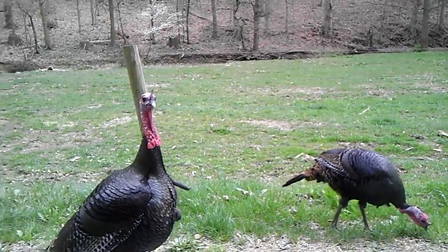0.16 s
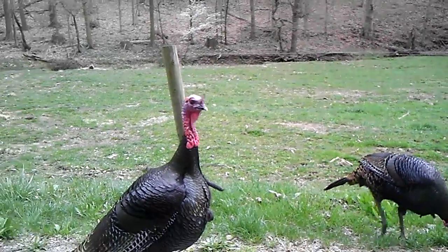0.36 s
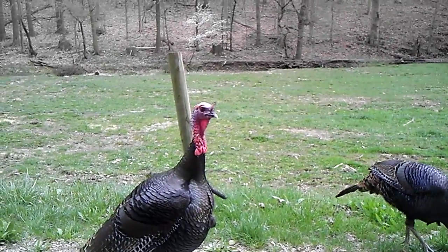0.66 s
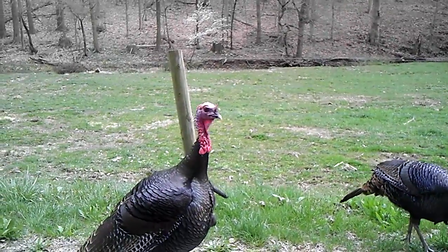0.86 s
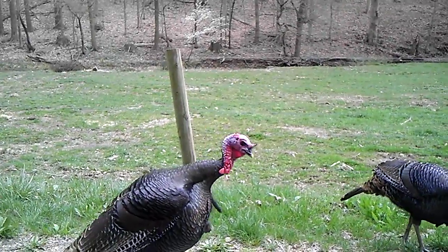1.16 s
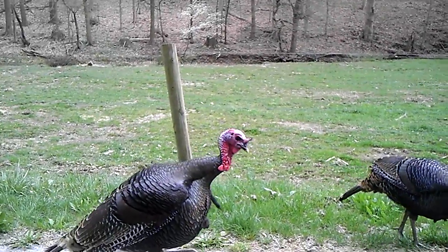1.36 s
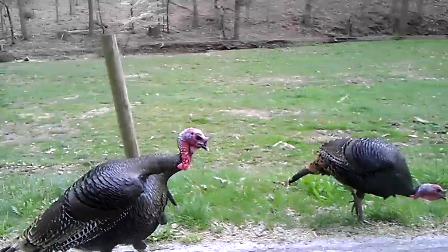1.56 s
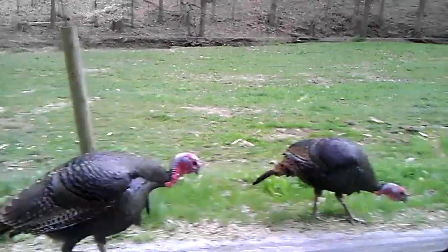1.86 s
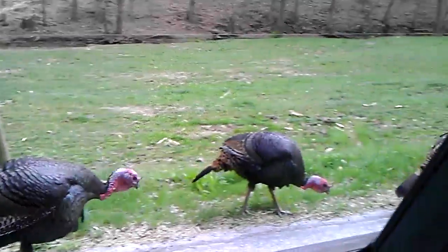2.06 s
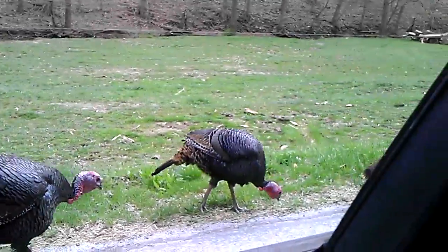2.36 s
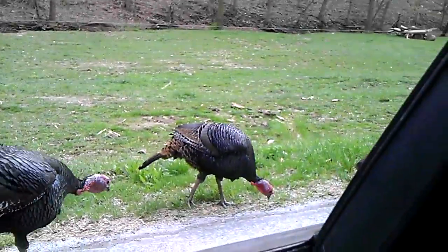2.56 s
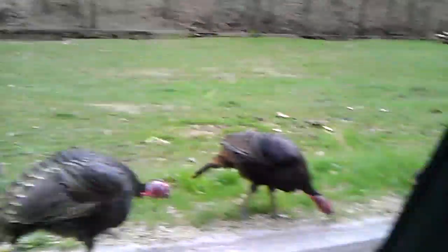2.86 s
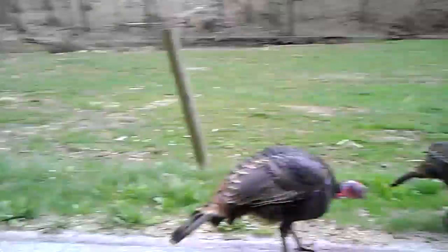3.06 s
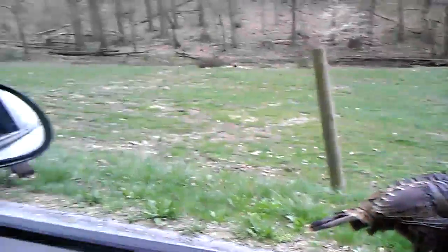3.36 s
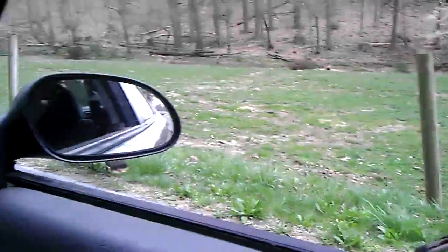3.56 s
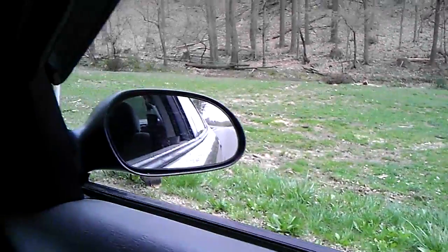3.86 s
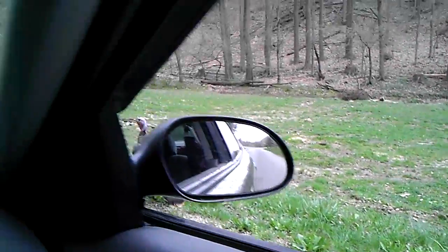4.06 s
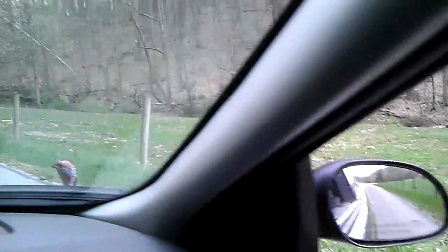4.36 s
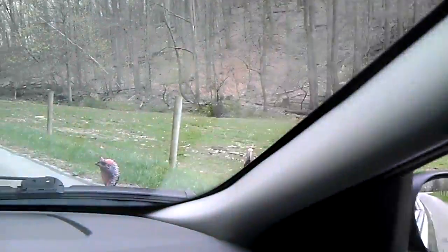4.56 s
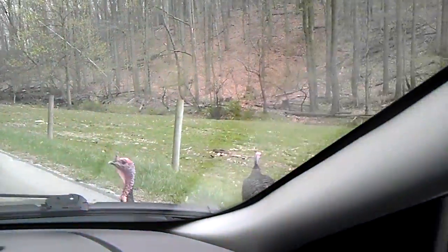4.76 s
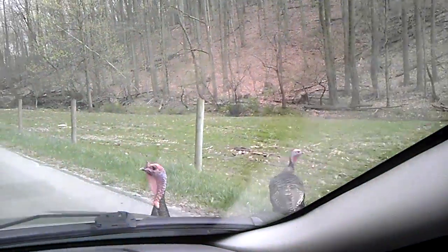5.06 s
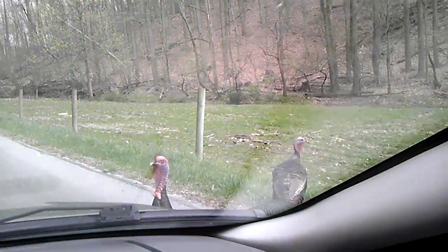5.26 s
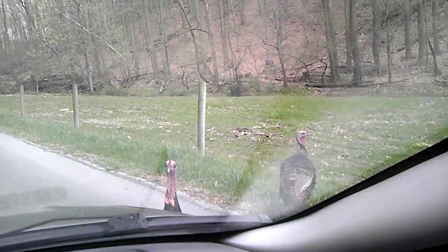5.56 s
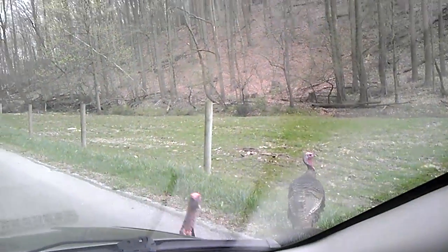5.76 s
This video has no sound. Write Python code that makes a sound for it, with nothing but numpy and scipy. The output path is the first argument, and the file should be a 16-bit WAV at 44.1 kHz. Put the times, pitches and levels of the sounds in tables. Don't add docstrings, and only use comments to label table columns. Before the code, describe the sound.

Wild turkeys at a roadside give three quick pairs of rising putts and falling, warbled yelps, then a close rolling purr. Fingers knock plastic and cloth brushes the handheld camera as it swings. A fainter purr follows farther off, over an idling engine and a low outdoor wash that dulls inside the car.

```python
import sys
import numpy as np
from scipy import signal
from scipy.io import wavfile
from scipy.ndimage import uniform_filter1d

SR = 44100
rng = np.random.default_rng(int(sys.argv[2]) if len(sys.argv) > 2 else 0)


def invert_db(x):
    u = np.asarray(x, float) / 20
    return 10 ** u


def wav_record(signal):
    frames = np.transpose(np.atleast_2d(signal))
    bounded = np.clip(frames, -1, 1)
    quanta = np.round(bounded * 32767).astype(np.int16)
    wavfile.write(sys.argv[1], SR, quanta)


N = 260631


def evened(x):
    return x / np.sqrt(np.mean(x ** 2) + 1e-20)


def read(points, hz):
    f, value = np.transpose(points)
    return np.interp(np.log(hz + 1), np.log(f + 1), value)


def along(rows):
    return np.interp(np.arange(N) / SR, [r[0] for r in rows], [r[1] for r in rows])


def swells(rows, rise_db_s, fall_db_s, rest_db):
    t = np.arange(N) / SR
    level = np.full(N, rest_db, float)
    for s, hold, db in rows:
        rise = rise_db_s * np.maximum(s - t, 0)
        fall = fall_db_s * np.maximum(t - s - hold, 0)
        level = np.maximum(level, db - rise - fall)
    return level


def add(mix, s, sound, pan_db, lead=0):
    side = np.tan(lead / 2) * signal.hilbert(sound).imag
    ports = np.array([sound - side, sound + side])
    part = mix[:, round(s * SR):][:, :len(sound)]
    part += invert_db(np.array([[.5], [-.5]]) * pan_db) * ports[:, :part.shape[1]]


def fuzz(hz, width_hz):
    r = np.exp(-np.pi * width_hz / SR)
    slow = signal.lfilter([1], np.convolve([1, -r], [1, -r]), rng.standard_normal((2, N)))
    carrier = np.exp(2j * np.pi * np.cumsum(hz * np.ones(N)) / SR)
    return evened(((slow[0] + 1j * slow[1]) * carrier).real)


def whistle(rows, crest=0, swing=0, dip_db=0):
    warble_hz, dip_lag_s, skew = 40.7, 0.012, .35
    onset_s, release_s, scoop = .006, 0.0073, 0.76
    s, hz, db = np.transpose(rows)
    t = np.arange(s[0] - onset_s, s[-1] + release_s, .001)
    shake = 2 * np.pi * warble_hz * (t - crest)
    pitch = np.interp(t, [t[0], *s], [scoop * hz[0], *hz])
    pitch = pitch * (1 + swing * (np.sin(shake + 0.77) + skew * np.sin(2 * shake + 2.8)))
    gain = np.interp(t, [t[0], *s, t[-1]], [1e-4, *invert_db(db), 1e-4])
    dip = (.5 + .5 * np.cos(shake - 2 * np.pi * warble_hz * dip_lag_s)) ** 2
    return np.transpose([t, pitch, 20 * np.log10(gain) - dip_db * dip])


def yelp(rows, octave_db, twelfth_db, steep):
    s, hz, db = np.transpose(rows)
    t = np.arange(s[0], s[-1], 1 / SR)
    pitch = uniform_filter1d(np.interp(t, s, hz), size=60)
    pitch = pitch * (1 + 0.053 * uniform_filter1d(rng.standard_normal(len(t)), size=50))
    turn = 2 * np.pi * np.cumsum(pitch) / SR
    climb = np.maximum((pitch / pitch.max()) ** steep, invert_db(-27))
    overtones = invert_db(octave_db) * np.sin(2 * turn) + invert_db(twelfth_db) * np.sin(3 * turn)
    level = uniform_filter1d(np.interp(t, s, invert_db(db)), size=40)
    return level * (np.sin(turn) + climb * overtones)


# time in seconds, pitch in Hz, peak level in dB.
RISING_PUTTS = [
    [(.398, 1217, -25.5), (.402, 1240, -32), (.405, 1416, -28), (.412, 1475, -32), (.426, 1350, -35.5)],
    [(.762, 1174, -16), (.765, 1435, -21), (.771, 1850, -41), (.776, 1835, -29.5), (.784, 1865, -44)],
    [(1.04, 1200, -32), (1.047, 1550, -28), (1.049, 1600, -46), (1.053, 1680, -47)],
]
# time in seconds, pitch in Hz, peak level in dB.
OPENING_NOTES = [
    [(2.54, 1070, -31), (2.545, 1210, -32), (2.55, 1180, -37), (2.557, 1240, -31), (2.565, 1190, -23.5),
     (2.575, 1150, -42), (2.579, 1160, -35)],
    [(2.61, 1135, -30), (2.62, 1155, -23), (2.626, 1230, -40), (2.632, 1220, -34), (2.64, 1210, -43)],
    [(4.196, 950, -43), (4.204, 1150, -48), (4.217, 1250, -43), (4.229, 1190, -47), (4.234, 1020, -44),
     (4.243, 1040, -42)],
    [(4.281, 1140, -46), (4.286, 1160, -38), (4.291, 1220, -43), (4.296, 1250, -39)],
]
# time in seconds, pitch in Hz, peak level in dB.
FALLING_YELPS = [
    [(.501, 1245, -29), (.51, 1210, -28), (.527, 1203, -24), (.545, 1050, -30.5), (.626, 878, -31),
     (.649, 763, -36)],
    [(.851, 1454, -45), (.857, 1250, -29), (.864, 1183, -21), (.882, 1140, -22), (.889, 979, -28),
     (.918, 860, -29.5)],
    [(1.153, 1313, -30), (1.158, 1310, -24), (1.161, 1120, -33), (1.166, 1042, -23.5), (1.178, 1010, -21.5),
     (1.197, 885, -36.5)],
]
# time of a crest in seconds, pitch swing as a share, dip in dB.
WARBLE = [
    (0.505, 0.047, 6),
    (.878, 0.061, 3),
    (1.154, 0.016, 1.5),
]
# octave in dB, twelfth in dB, steepness with pitch (exponent),
# left-right in dB, left lead in radians.
YELP_COLOUR = [
    (-13, -50, 9, -1.5, .45),
    (-38, -36, 4, -.5, .35),
    (-4, -45, 19, -1, .35),
    (-38, -50, 0, -.5, .35),
    (-40, -50, 3, -2.5, .25),
    (-33, -65, -4, 0, .35),
    (-10, -27, 14, -6, 1),
    (-7, -40, 35, -5, .5),
    (-6, -40, 16, -3, 2.4),
    (-3, -35, 9, -4, 2.4),
]
# start in seconds, length in seconds, from Hz, to Hz,
# peak level in dB.
AFTERTONES = [
    (.404, .002, 1220, 1170, -36),
    (.769, .018, 960, 870, -41),
    (1.074, .003, 980, 1020, -46),
    (1.059, .008, 3050, 3120, -54),
]


def yelps(mix):
    calls = [whistle(rows) for rows in RISING_PUTTS + OPENING_NOTES]
    calls += [whistle(rows, *shake) for rows, shake in zip(FALLING_YELPS, WARBLE)]
    calls.sort(key=lambda rows: rows[0][0])
    for rows, (*overtones, pan_db, lead) in zip(calls, YELP_COLOUR):
        add(mix, rows[0][0], yelp(rows, *overtones), pan_db, lead)
    for s, length, from_hz, to_hz, db in AFTERTONES:
        rows = whistle([(s, from_hz, db), (s + length, to_hz, db)])
        add(mix, rows[0][0], yelp(rows, -44, -50, 0), -2)


def purr_syllable(low_hz, low_db, middle_db, high_hz, high_db, swell, hold, after_db):
    t = np.arange(-swell, .04, 1 / SR)

    def wave(hz):
        return np.sin(2 * np.pi * (np.cumsum(hz * np.ones(len(t))) / SR + rng.random()))

    def joins(start, stay, fall_db_s):
        attack = np.clip((t - start) / .003, 0, 1) ** 2
        return attack * invert_db(-fall_db_s * np.maximum(t - start - stay, 0))

    rise = np.clip((t + swell) / .004, 0, 1) * invert_db(800 * np.minimum(t, 0))
    low = rise * np.clip(1 - t / .0045, 0, 1) + invert_db(after_db) * joins(.005, .005, 1700)
    low_line = invert_db(low_db) * low * wave(low_hz * (1 + 0.53 * t))
    middle_line = invert_db(middle_db) * joins(-0.003, 0.0061, 2400) * wave(.505 * (low_hz + high_hz))

    slid_hz = high_hz * (1 - 0.1076 * np.exp(-np.maximum(t, 0) / 0.0024))
    high = joins(.001, hold + .003, 2300)
    breath = signal.lfilter(*signal.butter(2, [1900, 3000], "band", fs=SR), rng.standard_normal(len(t)))
    high_line = invert_db(high_db) * high * wave(slid_hz)
    high_line += invert_db(high_db - 12) * joins(-.003, .016, 500) * breath
    high_line += high * (invert_db(-58) * wave(low_hz + slid_hz) + invert_db(-59.5) * wave(2 * slid_hz))
    return low_line, middle_line, high_line


# low line in Hz, its level in dB, middle level in dB, high line in Hz,
# its level in dB.
PURR_SYLLABLES = [
    (1107, -20, -29, 1645, -27.5),
    (1036, -16, -27, 1660, -25),
    (1034, -15, -25, 1710, -33.5),
    (1032, -13.5, -22.5, 1730, -28.5),
    (1110, -18, -26, 1694, -28),
    (1120, -43, -44, 1661, -37),
    (1010, -32.5, -44, 1724, -31),
    (996, -26.5, -41, 1745, -32),
    (1010, -34, -40, 1764, -35),
]
# first break in seconds, swell in seconds, hold in seconds, left-right in dB,
# low note after the break in dB.
PURR_SHAPE = [
    (2.678, .0135, .0048, -.3, -14),
    (4.3428, .0105, .0055, -2.5, -5),
]
PURR_LEAD = [
    (.6, 1.4, .7),
    (-1.1, 2.6, 2.1),
]


def purrs(mix):
    near_syllables, beat_s = 5, .0545
    for k, voice in enumerate(PURR_SYLLABLES):
        far = k >= near_syllables
        first, swell, hold, pan_db, after_db = PURR_SHAPE[far]
        s = first + beat_s * (k - far * near_syllables)
        lines = purr_syllable(*voice, swell, hold, after_db)
        for line, lead in zip(lines, PURR_LEAD[far]):
            add(mix, s - swell, line, pan_db, lead)


# delay in seconds, level in dB.
ECHOES = [(.0023, -22), (.0047, -24), (.0083, -25), (.013, -28), (.021, -31)]


def turkeys():
    tail_db, tail_t60_s = -21, .17
    mix = np.zeros((2, N))
    yelps(mix)
    purrs(mix)
    t = np.arange(6000) / SR
    taps = rng.standard_normal((2, len(t))) * invert_db(-60 * t / tail_t60_s) * np.clip(t / 0.001, 0, 1)
    taps *= invert_db(tail_db) / np.linalg.norm(taps[0])
    taps[:, 0] = 1
    for s, db in ECHOES:
        taps[:, int(s * SR)] = invert_db(db) * np.array([1, -.7])
    return signal.oaconvolve(mix, taps, axes=1)[:, :N]


# start in
# seconds, tick in dB, tick in Hz, crackle in dB, left-right in dB.
CLICKS = [(1.052, -39, 1500, -58, -2), (1.058, -40, 1200, -62, -2), (1.066, -36, 1400, -60, -2),
          (1.076, -42, 1100, -64, -2), (1.9295, -43, 3800, -47, -1.5), (1.932, -40, 2600, -54, -1.5),
          (2.023, -52, 12000, -60, 0), (2.4, -35, 3500, -50, -5), (2.401, -29, 1500, -48, -5.5),
          (2.596, -28, 2000, -66, -5.5), (2.5963, -33, 3100, -64, -5.5), (2.733, -29, 3000, -54, 3),
          (3.011, -33, 1500, -47, -5.5), (3.209, -36, 4700, -46, 1), (3.891, -47, 3000, -56, -1),
          (4.593, -35, 1500, -50, -2), (4.595, -44, 3000, -60, -2), (.758, -42, 2400, -60, -1)]
# frequency in Hz, T60 in seconds, level in dB.
SHELL_MODES = [(513, 0.036, 3), (870, 0.011, 4)]
# start in seconds, thud in dB.
KNOCKS = [
    (1.9295, -45),
    (2.401, -33),
    (2.596, -42),
    (2.733, -50),
    (3.011, -29),
    (3.209, -50),
    (4.593, -42),
]


def clicks():
    mix, t = np.zeros((2, N)), np.arange(2600) / SR
    for s, tick_db, hz, crackle_db, pan_db in CLICKS:
        cycles = hz * t - 1.2
        tick = np.cos(2 * np.pi * cycles) * np.exp(-(cycles / 0.9) ** 2)
        crackle = np.diff(rng.standard_normal(len(t) + 1)) * np.exp(-t / 0.0014)
        add(mix, s, invert_db(tick_db) * tick + invert_db(crackle_db) * crackle, pan_db)
    thud = sum(invert_db(db - 60 * t / t60) * np.sin(2 * np.pi * hz * t) for hz, t60, db in SHELL_MODES)
    thud = thud * np.minimum(t / 0.00048, 1)
    for s, thud_db in KNOCKS:
        add(mix, s, invert_db(thud_db) * thud, -8)
    return mix


# start in seconds, hold in seconds, level in dB.
BRUSH_STROKES = [
    (1.93, .22, -59.5),
    (2.915, .035, -52),
    (3.012, .03, -49),
    (3.06, .065, -44),
    (3.14, .05, -54),
    (4.29, .006, -52.5),
]
# frequency in Hz, level in dB per Hz.
CLOTH = [(880, -11), (1500, 1), (2210, 0.5), (2570, -1.5), (4330, -1), (5180, -10), (7080, -9.5),
         (13200, -9), (14400, -31)]


def brush():
    sparks = rng.exponential(1, N) ** 2 * (rng.random(N) < .02)
    grains = 1 + 0.4 * uniform_filter1d(sparks, size=20)
    return invert_db(swells(BRUSH_STROKES, 250, 500, -71)) * evened(grains * noise(CLOTH, 0.47))


# time in seconds, level in dB.
IDLE = [(0.0, -62), (0.15, -58), (1.65, -68), (1.94, -55), (2.7, -56.5), (3.01, -69), (3.11, -59),
        (3.31, -54.5), (3.92, -69), (4.02, -62), (5.66, -59.5), (5.91, -64)]
# multiple of the firing rate, level in dB.
ORDERS = [(2, -73.5), (3, -62.5), (4, -66)]


def firing_hum():
    idle_hz, inside_s, swing_s, boom_db = 35.73, 4.2, .5, 29
    t = np.arange(N) / SR
    hum = np.sqrt(2) * invert_db(along(IDLE)) * np.sin(2 * np.pi * idle_hz * t)
    inside = np.clip((t - inside_s) / swing_s + .5, 0, 1)
    for k, db in ORDERS:
        boom = boom_db * inside - 15 if k == 2 else 0
        hum += invert_db(db + boom) * fuzz(k * idle_hz, 3.4)
    return hum


# start in seconds, hold in seconds, level in dB.
DRONE = [
    (.18, 0.43, -55),
    (2.07, 0.042, -45),
    (3.45, 0.11, -46),
    (4.6, 0.42, -47),
    (5.5, 0.28, -43.5),
]


def exhaust_drone():
    return invert_db(swells(DRONE, 59, 40, -51) - 6.0) * fuzz(268.9, 47)


# start in seconds, hold in seconds, level in dB.
WHINE = [
    (1.22, 1.98, -72.5),
    (4.02, 1.08, -72.5),
    (5.9, .1, -74),
]


def alternator_whine():
    whine = invert_db(swells(WHINE, 120, 70, -80)) * fuzz(12775, 30)
    return whine * invert_db(np.array([[1.5], [-1.5]]))


# start in seconds, hold in seconds, level in dB.
HOLLOW = [
    (3.6, .4, -65),
    (4.1, .25, -59),
    (4.52, .12, -51.5),
    (4.7, .17, -55),
    (5.08, .33, -57),
]


def cabin_hollow():
    ports = np.array([fuzz(1340, 200) for _ in range(2)])
    return invert_db(swells(HOLLOW, 45, 80, -120)) * ports


def engine():
    fan = invert_db(along(FACING) - 9.5) * fuzz(2400, 500)
    return firing_hum() + exhaust_drone() + fan + alternator_whine() + cabin_hollow()


# frequency in Hz, likeness from 0 to 1.
LIKENESS = [(30, .995), (125, 0.98), (300, 0.89), (700, 0.62), (1500, 0.05), (3000, 0.21), (8000, 0.11),
            (13000, 0.15)]


def noise(spectrum, patchy_db, change_db=0):
    frames, hz = N // 256 + 5, np.fft.rfftfreq(1024, 1 / SR)
    a, b, c, d, patches = rng.standard_normal((frames, 513, 5)).T
    patches = uniform_filter1d(uniform_filter1d(patches, size=12, axis=0), size=10, axis=1)
    same = np.clip(read(LIKENESS, hz), -1, 1)[:, None]
    left = a + 1j * b
    right = same * left + np.sqrt(1 - same ** 2) * (c + 1j * d)
    z = np.array([left, right]) * invert_db(read(spectrum, hz)[:, None] + patchy_db * evened(patches))
    steady = np.sqrt(np.mean(abs(z) ** 2) * 513 * 2)
    return evened(signal.istft(z / steady * invert_db(change_db), nperseg=1024, noverlap=768)[1][:, :N])


# frequency in Hz, level in dB per Hz.
WASH = [(26, -48), (45, -8.5), (90, -22), (125, -2.5), (209, -3.5), (256, -3), (394, -7.5), (428, -5.5),
        (536, -8.5), (807, -15), (1320, -18.5), (1760, -23), (2340, -24.5), (2930, -29.5), (6000, -41),
        (7800, -46), (13200, -120)]
# time in seconds, openness in dB.
FACING = [(0, -57.5), (1.8, -57.5), (2.1, -55.5), (2.95, -54.5), (3.2, -58), (4.4, -61), (5.0, -65),
          (5.91, -66)]
# frequency in Hz, share of the change.
FACING_SHARE = [(200, -0.019), (600, 0.18), (1500, 0.98), (3000, 0.6)]


def wash():
    frame_starts = np.minimum(np.arange(N // 256 + 5) * 256, N - 1)
    facing_db = along(FACING)[frame_starts] + 61
    change_db = read(FACING_SHARE, np.fft.rfftfreq(1024, 1 / SR))[:, None] * facing_db
    return invert_db(-44.5) * noise(WASH, 0.61, change_db)


# frequency in Hz, level in dB per Hz.
HISS = [(2940, -2), (5000, -0.5), (6260, -12), (8210, -3.5), (11800, -1), (13500, 1.5), (14000, -7.5)]


def microphone_hiss():
    return invert_db(-59.5) * noise(HISS, 1.0)


def scene():
    return turkeys() + clicks() + brush() + engine() + wash()


# frequency in Hz, share of cells emptied.
GAPS = [(3000, 0.003), (4500, 0.045), (5800, 0.12), (7200, 0.11), (8500, 0.074), (13000, 0.0035)]
# start in seconds, length in seconds, shortage from 0 to 1.
STARVED = [
    (.5, .065, .6),
    (.84, .065, .5),
    (1.02, .04, .25),
    (1.147, .05, .55),
    (2.53, .075, 1),
    (2.58, .055, .35),
    (2.77, .05, .86),
    (2.835, .062, 1.02),
    (4.38, .16, .45),
    (4.43, .095, .74),
]
# frequency in Hz, shortage that empties it.
RESERVE = [(4200, 1.2), (5500, .5), (6700, .12), (8300, .5), (9000, .75), (12200, .85), (12800, 1.3),
           (13600, .58)]


def treble_dropouts(heard):
    hz, t, z = signal.stft(heard, SR, nperseg=512, noverlap=384)
    kept = np.ones(z.shape[1:]) * (hz < 14060)[:, None]
    cells = rng.random((len(hz) // 2 + 1, len(t) // 12 + 1))
    cells = cells.repeat(2, axis=0).repeat(12, axis=1)[:len(hz), :len(t)]
    kept *= cells > read(GAPS, hz)[:, None]
    for start, length, shortage in STARVED:
        arch = abs(np.sin(np.pi * np.clip((t - start) / length, 0, 1))) ** (1 / 3)
        kept *= shortage * arch < read(RESERVE, hz)[:, None]
    return signal.istft(z * kept, nperseg=512, noverlap=384)[1][:, :N]


def roll_off(x):
    return signal.sosfilt(signal.butter(12, 15130, fs=SR, output="sos"), x)


def record(dry):
    mix = treble_dropouts(dry + microphone_hiss())
    return roll_off(mix)


dry = scene()
out = record(dry)
wav_record(out)
```